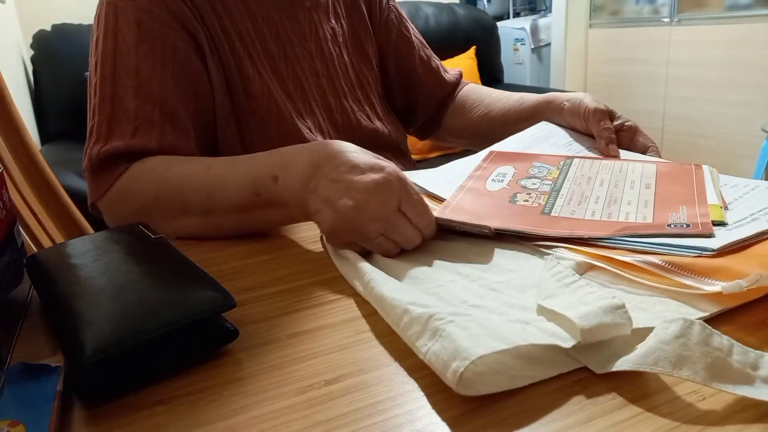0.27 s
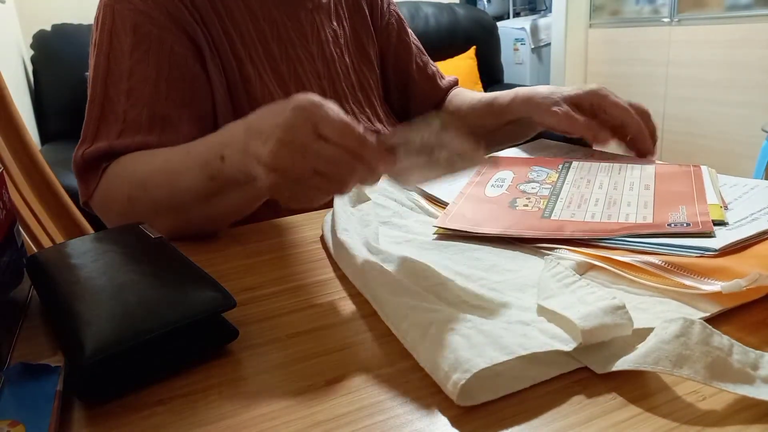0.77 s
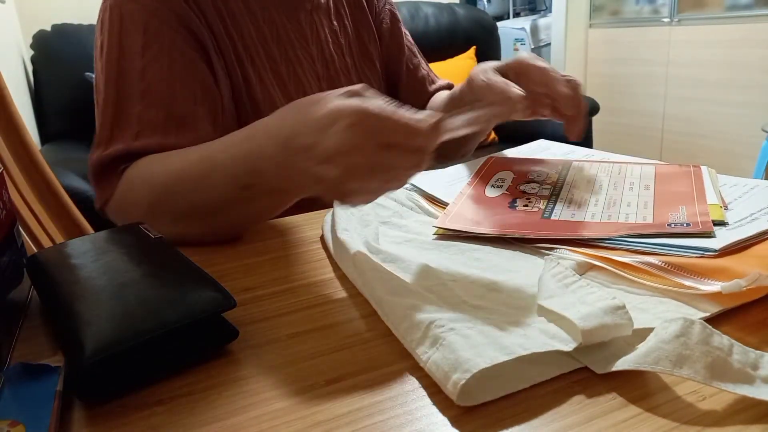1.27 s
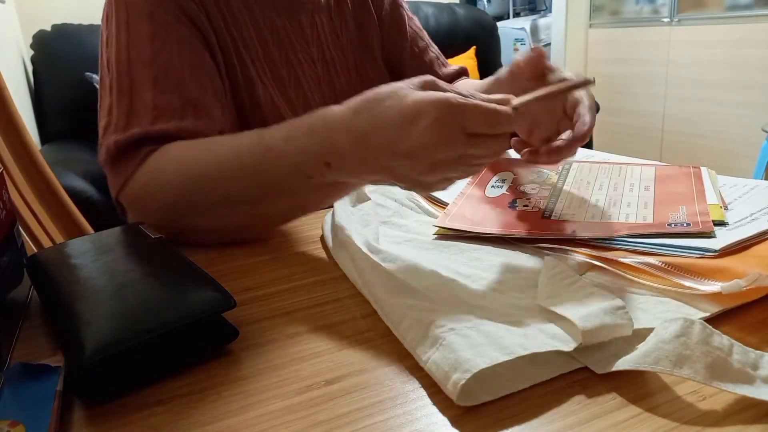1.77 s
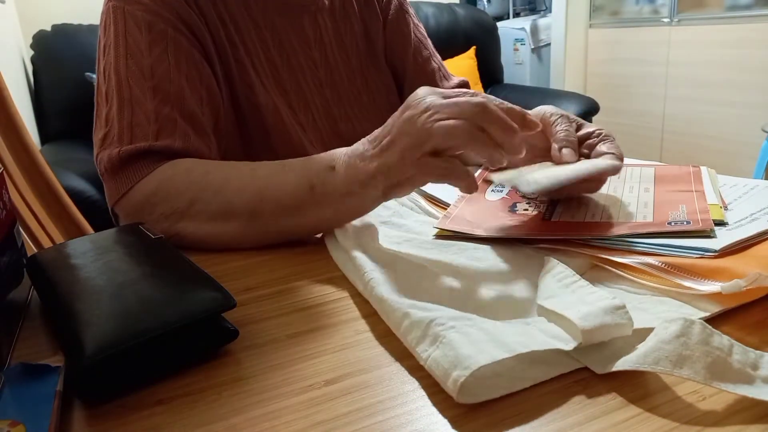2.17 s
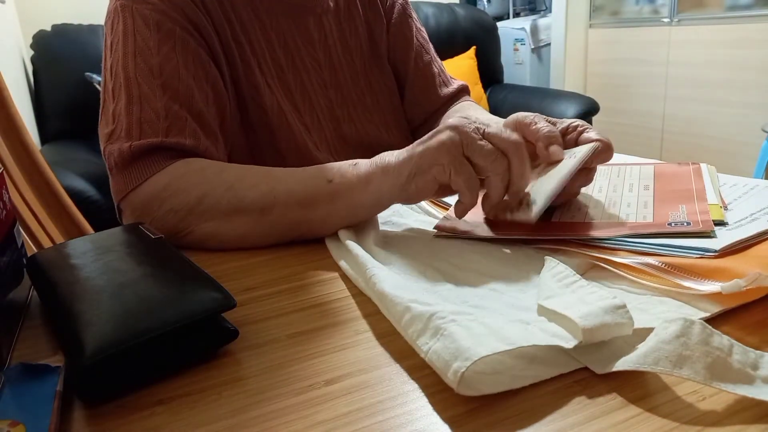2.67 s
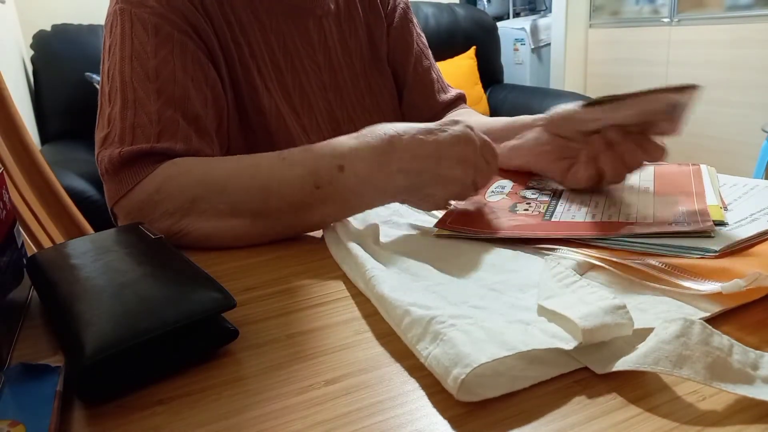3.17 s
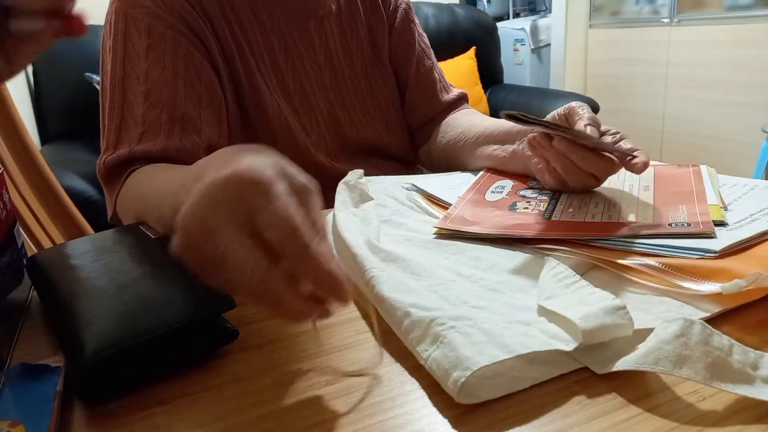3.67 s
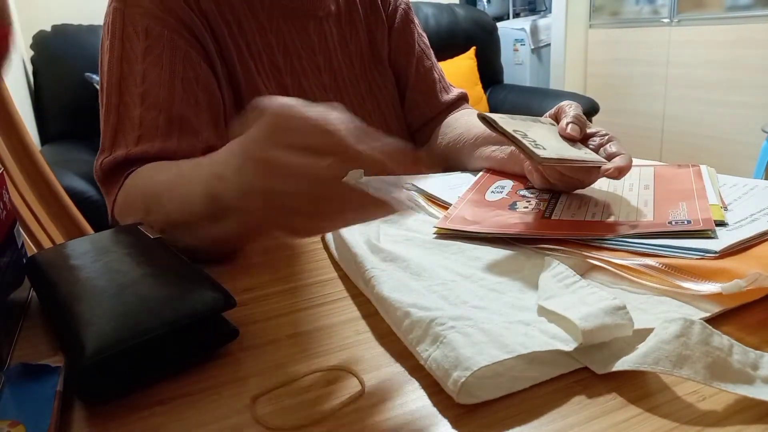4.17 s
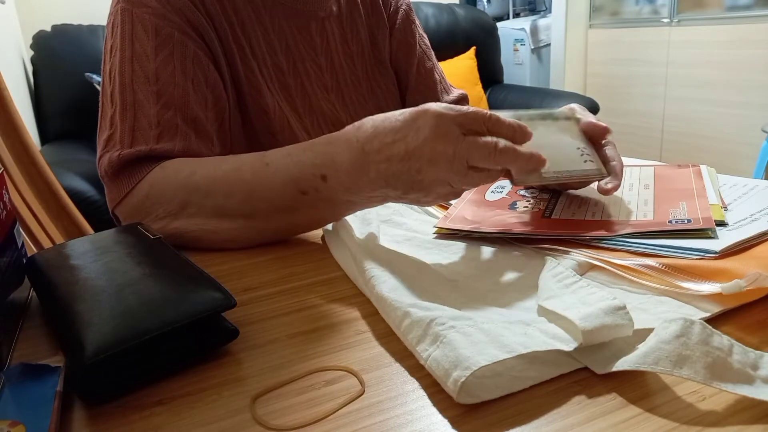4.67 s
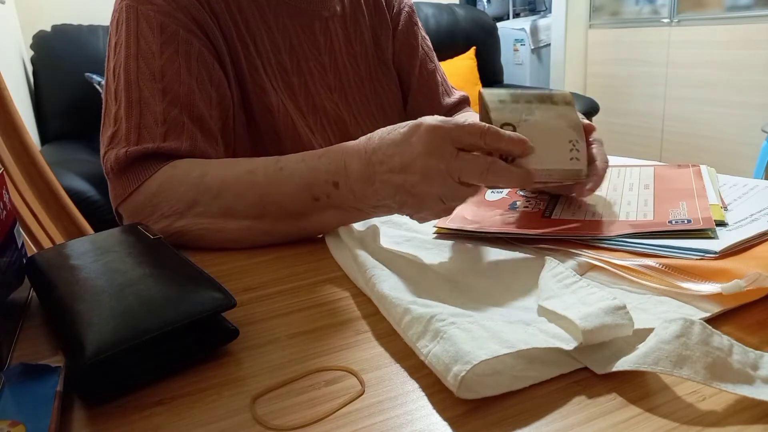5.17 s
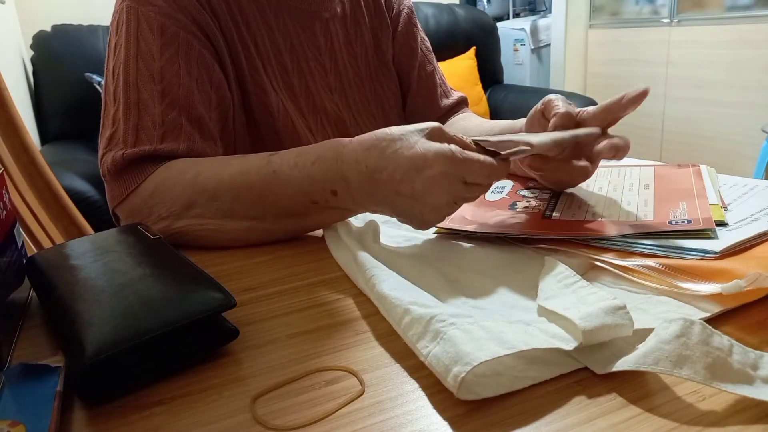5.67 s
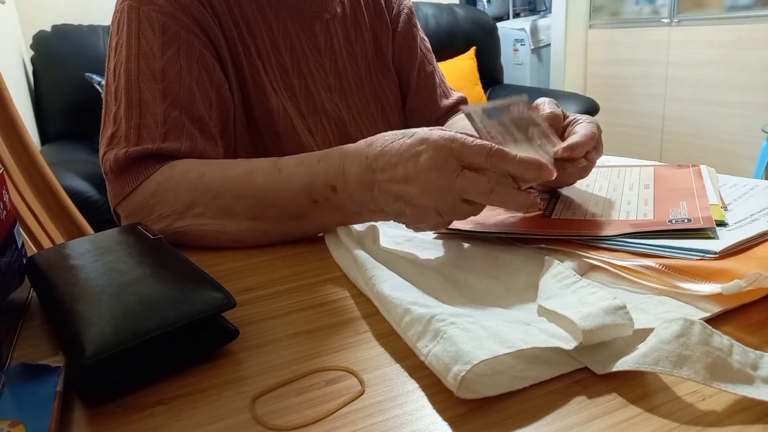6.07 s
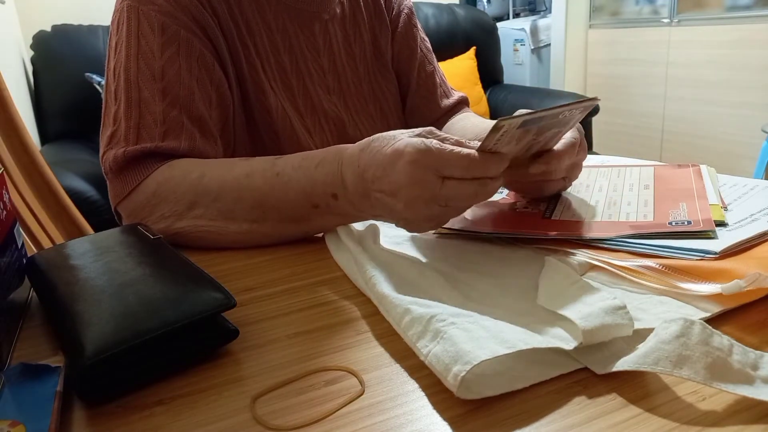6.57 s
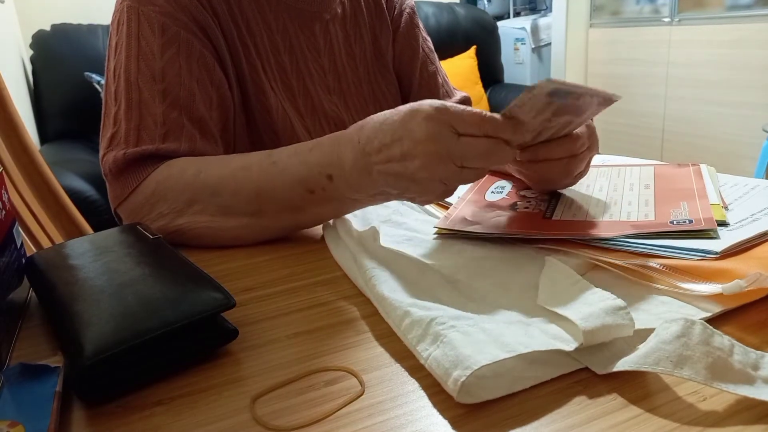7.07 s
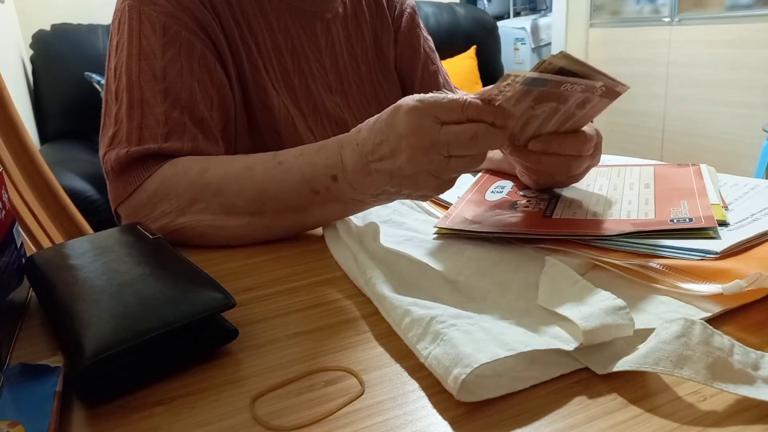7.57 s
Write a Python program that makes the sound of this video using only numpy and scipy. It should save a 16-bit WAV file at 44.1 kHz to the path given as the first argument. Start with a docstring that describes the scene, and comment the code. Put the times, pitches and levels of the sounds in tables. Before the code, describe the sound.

Paper swishes and crackles softly as booklets and banknotes are handled close by, with arms now and then thudding on a wooden table. Past the middle, something hollow and plastic rattles to the left, drops loudly and rebounds, giving a few more light knocks. Quiet counting of the notes follows. A low machine hum fills the small, hard-walled room throughout.

```python
"""A low hum fills a small hard room. Close to a two-port microphone, hands bump a wooden table, slide
booklets, turn a wad of banknotes and count it: grainy swishes of friction, dotted with popping creases.
From about 5 s, out of sight on the left, a hollow plastic thing rocks, falls and bounces, each knock
an edge crack over ringing walls and a low boom. Soft paper strokes and two more thuds close the scene."""
import sys
import numpy as np
from scipy import signal
from scipy.fft import rfft, irfft, next_fast_len
from scipy.io import wavfile
from scipy.ndimage import map_coordinates

SR = 44100
rng = np.random.default_rng(int(sys.argv[2]) if len(sys.argv) > 2 else 0)


def generate_wav(signal):
    """Clip the signal to [-1, 1] and save it as 16-bit WAV at the path in sys.argv[1]."""
    frames = np.transpose(np.atleast_2d(signal))
    scaled = np.clip(frames, -1, 1) * 32767
    pcm = np.round(scaled).astype(np.int16)
    wavfile.write(sys.argv[1], SR, pcm)


N = 344858

# Paper strokes: (loudest time [s], swell [s], fade [s], relative slide level [dB],
# then, against the slide: sheet body [dB], fine hiss [dB], rasp [dB])
STROKES = [(0.1, 0.0029, 0.11, -61.5, -22, -1, -25.5), (0.38, 0.084, 0.58, -73.5, -19, -30, 4),
           (0.569, 0.012, 0.043, -70.5, -14, -12, 17), (0.68, 0.98, 0.13, -69, -7, -5, 0),
           (0.752, 0.19, 0.079, -66, -5, -11, -23), (1.264, 0.01, 0.62, -72.5, -4.5, -8.5, -19),
           (1.4, 0.052, 0.15, -59, 1, -2.5, -5), (1.716, 0.34, 0.16, -62, -9, -4.5, -21),
           (2.03, 0.056, 0.18, -56.5, -6.5, -6, -3.5), (2.131, 0.15, 0.068, -58.5, -15, -1.5, -4),
           (2.34, 0.041, 0.17, -74, 3, -4, 13.5), (2.501, 0.092, 0.15, -75, -3.5, -9, -6),
           (2.801, 0.12, 0.089, -67.5, -12, -0.5, -9.5), (3.1, .15, 0.19, -67.5, -4, -9, 0.5),
           (3.752, 0.13, 0.17, -69.5, 1.5, -11, -16), (3.95, 0.29, 0.16, -77.5, -19, -12, -10),
           (4.45, 0.24, .2, -76, -22, -7, -15), (5.821, 0.2, 0.46, -78, -9, -7, -11.5),
           (6.87, 0.39, 0.13, -82.5, -5, -9, -21.5), (7.292, 0.11, 0.1, -71, -12, -4.5, -25),
           (7.546, 0.27, 0.14, -80, -9, -6.5, -20.5), (7.8, 0.25, 0.17, -72, -4.5, -11, -19)]
STROKE_RANGE_DB = 20  # rise over the swell time, drop over the fade time
# The fingers never rest: (relative slide level [dB], against it: body [dB], fine hiss [dB], rasp [dB])
FIDGET_DB = (-91, 5, -5, -17.5)
# Colours of the paper's slide, sheet body and fine hiss: (frequency [Hz], level [dB])
SLIDE_TONE = [(1530, -21.5), (2600, -42), (2940, 1.5), (3090, -3.5), (3790, 2.5), (5360, 2.5), (6600, 8),
              (8000, -10), (10400, -45.5), (17600, -120)]
SHEET_TONE = [(290, -48), (500, -3.5), (863, -2.5), (1550, -4), (1970, -12), (2530, -7.5), (3010, -14.5),
              (3400, -12.5), (4420, -70.5)]
FINE_TONE = [(4410, -29), (7500, -4), (11000, 0), (12400, 0), (13400, -2), (14900, -4), (15900, -12),
             (16300, -35.5)]
# A stiff cover scraping over the pile: (frequency [Hz], width [Hz], level per pass [dB])
RASP_MODES = [(1476, 600, 1.5), (2260, 790, 5)]
# Creases popping: (time [s], relative level [dB], sheet ring [dB], ring pitch [Hz], fine hiss [dB],
# left over right [dB])
CREASE_POPS = [(0.098, -46, -7.5, 1880, -16, 8), (0.281, -59.5, 8.5, 2420, -26, 8.5),
               (0.3437, -60, 12, 2510, -19, -1), (0.365, -53.5, 5.5, 1800, -16, 5),
               (0.472, -49, -3, 1820, -29, 3.5), (0.5604, -46, 2, 1940, -22, 6),
               (0.573, -46.5, -1.5, 2340, -16, 0), (1.0958, -76.5, 27, 1390, -2, 5),
               (1.3598, -27, -12, 2550, -14, -2.5), (1.3724, -33, 0.5, 2380, -10, 5),
               (1.9803, -54, 3.5, 2150, -2, -12), (2.011, -26.5, -5.5, 2110, -5, -14),
               (2.323, -51.5, 2, 2280, -10, 1.5), (2.3422, -52.5, 7, 2030, -8, 2),
               (2.666, -62, 12, 1600, -23, 5.5), (3.0722, -44, 1.5, 1710, -19, 5.5),
               (3.11, -41, -2, 1586, -37, 4), (4.212, -64, -27, 1270, 3, 7), (4.342, -65, -34, 1250, 6, 14),
               (4.4164, -65, -29, 2060, 5.5, 18), (4.646, -62.5, -18, 1460, -2, 6)]
# The crack of a crease: (frequency [Hz], level [dB])
CREASE_TONE = [(1530, -29), (2600, 4.5), (3090, -1.5), (5760, 4), (8000, -8), (10400, -77)]
# Fingertips on an edge: (time [s], half length [s], pitch [Hz], glide [Hz/s], relative level [dB])
EDGE_RUBS = [(1.655, .04, 1000, 0, -72), (3.775, .06, 1200, -1500, -65), (4.296, 0.05, 3680, 0, -83),
             (4.45, .075, 3800, 6000, -78), (7.56, 0.065, 3280, 0, -77), (7.53, .085, 4350, 0, -73)]

# The plastic thing knocking: (time [s], relative level [dB], wall pitch [Hz], rim ring [dB], boom [dB],
# crack [dB], tick over crack [dB])
KNOCKS = [(4.975, -56, 870, -7, -5, 7, -1), (5.062, -56, 905, -14, 1, 10.5, -17),
          (5.096, -33.5, 850, -17, -4.5, 2.5, -4), (5.105, -29, 867, -30, -7, -19, -13),
          (5.181, -38, 840, -7, 2.5, -2.5, -17.5), (5.19, -33.5, 837, -17, -15, -14, -15),
          (5.24, -31, 875, -22, -6.5, 5, -9.5), (5.254, -23, 842, -15, -15, -14, 2),
          (5.275, -26, 854, -24, -3.5, -17, -1.5), (5.322, -39.5, 864, -4, 5, 2, 2),
          (5.331, -29.5, 895, -9, -23, -4, -15.5), (5.357, -35.5, 815, -9, 2, 7.5, -11),
          (5.386, -9.5, 812, -20, -6, -6.5, -13), (5.399, -29, 800, -21, -1, 4.5, -18.5),
          (5.627, -34, 904, -14.5, -14, -3, -10.5), (5.648, -34.5, 870, -21, -20, -18.5, 7),
          (5.925, -38, 887, -14, -20, -12.5, -13), (5.931, -38, 844, -9.5, -11, -23, -11),
          (5.969, -34, 810, -26, -7, -11.5, -22), (6.075, -48, 824, -6.5, -6, -16, -16),
          (6.095, -31, 867, -16.5, -13, -6.5, -15.5), (6.11, -43.5, 883, -16, -2, -12, -6)]
# The crack of its hard edge: (frequency [Hz], level [dB])
EDGE_TONE = [(1000, -3), (1620, 0), (1800, -17.5), (2020, -11.5), (2390, -4), (3350, -5.5), (3650, 1),
             (4160, -8.5), (6540, -7), (7500, -17.5), (9750, -55)]
# The bright tick on top of a contact: (frequency [Hz], level [dB])
TICK_TONE = [(4410, -45), (7500, -8), (11700, 6.5), (13500, -2), (14700, 1.5), (16300, -19.5)]
# Its air and the floor under it: (frequency [Hz], width [Hz], level per pass [dB])
CAVITY_MODES = [(201, 150, -0.5), (507, 130, 3)]
WALL_WIDTH_HZ, RIM_HZ, RIM_WIDTH_HZ, FLOOR_HZ = 135, 2370, 310, 111
LANDING_S, FIRST_FLIGHT_S, FLIGHT_RATIO = 5.386, 0.044, 0.65  # each bounce is shorter than the last

# Arms and hands landing on the table: (time [s], relative level [dB], pitch [Hz])
THUDS = [(0.038, -42, 214), (0.069, -34.5, 115), (0.71, -47, 594), (1.371, -37, 202), (3.18, -38, 175),
         (3.353, -46, 187), (3.704, -39.5, 300), (3.756, -37, 332), (3.967, -42, 134), (4.027, -43.5, 212),
         (7.17, -41.5, 126.7), (7.216, -39.5, 155)]

# The hum's slow swells: (time [s], level [dB])
HUM_LEVEL = [(0.0, -50), (0.24, -57.5), (2.83, -58), (3.09, -55), (4.42, -56.5), (5.66, -54), (7.62, -58.5),
             (7.82, -56.5)]
# Colours of the hum and the hiss: (frequency [Hz], level [dB])
HUM_TONE = [(15, -76), (25, -40.5), (43, -10), (55, -11.5), (69, -0.5), (88, 1.5), (114, -10.5),
            (184, -2.5), (264, -12.5), (395, -10.5), (424, -16.5), (454, -17), (700, -48), (1540, -120)]
HISS_TONE = [(500, -1), (596, -4), (786, -14), (922, -9), (1350, -17), (2280, -17), (4450, -25),
             (6410, -12), (7420, -29), (14900, -25), (16300, -34)]
# Stereo image of the hum and hiss: (frequency [Hz], left-right likeness [-1..1])
BED_LIKENESS = [(60, 0.87), (180, 0.99), (550, 0.29), (1650, -0.15), (4970, -1), (15000, 0.71)]
# Stereo image of the reverb: (frequency [Hz], left-right likeness [0..1])
ROOM_LIKENESS = [(200, 0.92), (800, 0.41), (2500, 0.15), (8000, 0.194)]
# The room's early decay: (frequency [Hz], time to fall 60 dB [s])
ROOM_T60 = [(200, 0.12), (1000, 0.4), (4000, 0.47), (12000, 0.48)]
LATE_DB, LATE_T60_S = -30.5, 0.73  # the faint long tail
LOW_CUT_HZ, TOP_HZ = 45, 16000


def paper_slides():
    """Paper rubs on paper: slide, sheet body, fine hiss and rasp swell and fade with each stroke."""
    t = np.arange(N) / SR
    layers = [friction(shape(SLIDE_TONE), grain_db=1.5), friction(shape(SHEET_TONE), grain_db=0.5),
              friction(shape(FINE_TONE), grain_db=1.5), friction(resonances(RASP_MODES), grain_db=3.0)]
    layer_power = lambda db, *over_db: amp(db + np.array([0, *over_db])[:, None]) ** 2
    power = layer_power(*FIDGET_DB)
    for time, swell, fade, *levels in STROKES:
        envelope = amp(-STROKE_RANGE_DB * np.maximum((time - t) / swell, (t - time) / fade))
        power = power + layer_power(*levels) * envelope ** 2
    return amp(4.0) * sum(gain * layer for gain, layer in zip(np.sqrt(power), layers))


def crease_pops():
    """Each crease cracks, coloured by a quick echo off the table; the sheet flaps and briefly rings."""
    out = np.zeros((2, N))
    for time, db, ring_db, hz, fine_db, pan_db in CREASE_POPS:
        crack = burst(lambda f: shape(CREASE_TONE)(f) * comb(f, delay_s=2 / hz, share=0.6), t60=0.016)
        hiss = amp(fine_db) * burst(shape(FINE_TONE), t60=0.016)
        sheet = amp(ring_db) * burst(resonances([(800, 700, -2), (hz, 900, 0)]), t60=0.031)
        lag = round(np.clip(3 * pan_db, -20, 20))  # the louder side also hears it first
        place(out, time, amp(db - 6.0) * (crack + hiss + sheet), pan_db, lag, wet_db=-3)
    return out


def fingertip_rubs():
    """Fingertips run along an edge: a narrow hiss that swells and fades, sometimes gliding."""
    out = np.zeros((2, N))
    for time, half_length, hz, glide, db in EDGE_RUBS:
        t = np.arange(N) / SR - time
        swell = np.exp(-(t / half_length) ** 2)
        rumble = friction(lambda f: 1 / (1 + (f / 220) ** 2), grain_db=0.8)
        carrier = np.cos(2 * np.pi * (hz + glide * t / 2) * t)  # lifts the rumble up to pitch
        out += amp(db) * swell * rumble * carrier
    return out


def plastic_clatter():
    """Each knock cracks at the edge; the hollow body's walls and cavity take milliseconds to speak."""
    out = np.zeros((2, N))
    for time, db, hz, rim_db, boom_db, crack_db, tick_db in KNOCKS + bounces():
        onset = time - 0.0013
        stretch = np.exp(rng.normal(0, 0.07))  # each blow lands on another part of the edge
        wall_modes = [(hz, WALL_WIDTH_HZ, 0), (1.78 * hz, 2 * WALL_WIDTH_HZ, -9)]
        wall = ring(wall_modes, t60=0.013, rise=0.002)
        rim_mode = [(RIM_HZ * np.sqrt(stretch), RIM_WIDTH_HZ, 0)]
        rim = amp(rim_db) * ring(rim_mode, t60=0.012, rise=0.00092)
        edge = lambda f: shape(EDGE_TONE)(f * stretch) * comb(f, delay_s=0.001 * stretch, share=-0.35)
        crack = burst(edge, t60=0.012)
        crack += amp(tick_db) * burst(shape(TICK_TONE), t60=0.016)
        knock = trim_send(wall, -3) + trim_send(rim, -2) + amp(crack_db) * trim_send(crack, -3.5)
        place(out, onset, amp(db - 4.5) * knock, pan_db=11.0, lag=20, wet_db=3.5)  # on the ports' axis
        cavity = amp(boom_db) * burst(resonances(CAVITY_MODES), t60=0.0072, rise=0.0021)
        floor = amp(-16.5) * burst(resonances([(FLOOR_HZ, 120, 0)]), t60=0.054, rise=0.0041)
        # The bass bends round to the far port.
        place(out, onset, amp(db - 2.5) * (cavity + floor), pan_db=-3.5, lag=20, wet_db=2.5)
    return out


def bounces():
    """Four rebounds after the fall, as rows like KNOCKS: each comes sooner, softer and duller."""
    rows = []
    for k in range(4):
        time = LANDING_S + FIRST_FLIGHT_S * (1 - FLIGHT_RATIO ** (k + 1)) / (1 - FLIGHT_RATIO)
        db, crack_db = -18 - 1.5 * k, -1.5 - 4.5 * k
        wall_hz, rim_db, boom_db, tick_db = 800, -13, -4, -14.5
        rows.append((time, db, wall_hz, rim_db, boom_db, crack_db, tick_db))
    return rows


def table_thuds():
    """Soft flesh on wood: a dull low ring without a crack."""
    out = np.zeros((2, N))
    for time, db, hz in THUDS:
        thud = burst(resonances([(hz, 150, 0)]), t60=0.066, rise=0.012)
        place(out, time, amp(db - 7.0) * thud, pan_db=1.0, lag=0, wet_db=-1.0)
    return out


def machine_hum():
    """The bed: a low, wavering machine hum over a faint hiss."""
    hum_db = np.interp(np.arange(N) / SR, *np.transpose(HUM_LEVEL))
    hum = amp(hum_db + 2.4 * wobble(14)) * diffuse(HUM_TONE)
    hiss = amp(-77 + 0.27 * wobble(6.4)) * diffuse(HISS_TONE)
    return hum + hiss


def room(send):
    """Stereo room reverb, cut down after 0.1 s as by a noise gate, leaving a faint tail."""
    hz, t, noise = signal.stft(rng.standard_normal((2, SR // 2)), SR, nperseg=256)
    alike = np.clip(along(ROOM_LIKENESS, hz), 0, 1)[:, None]
    noise[1] = alike * noise[0] + np.sqrt(1 - alike ** 2) * noise[1]
    early_db = -60 * t / along(ROOM_T60, hz)[:, None] - 220 * np.maximum(t - 0.1, 0)
    late_db = LATE_DB - 60 * t / LATE_T60_S
    tail = signal.istft(noise * amp(np.maximum(early_db, late_db)), SR, nperseg=256)[1]
    return signal.fftconvolve(send[None], tail / np.linalg.norm(tail[0]), axes=1)


def place(out, time, hit, pan_db, lag, wet_db):
    """Mixes in a (direct, send) hit and its reverb; the right port hears both lag samples later."""
    direct, send = hit
    wet = amp(wet_db) * room(send)
    left = round(time * SR)
    for port, start, gain_db in (0, left, pan_db / 2), (1, left + lag, -pan_db / 2):
        heard = wet[port]
        heard[:len(direct)] += amp(gain_db) * direct
        out[port, start:start + len(heard)] += heard[:N - start]


def trim_send(hit, db):
    """Changes only how much of a hit feeds the room."""
    return hit * amp([[0], [db]])


def burst(response, t60, rise=0.0008):
    """A contact as (direct, send): a noise burst and a click of the same colour; t60 and rise in s."""
    t = np.arange(SR // 10) / SR
    noise = amp(-60 * t / t60) * (1 - np.exp(-t / rise)) * rng.standard_normal(len(t))
    click = np.arange(len(t)) == 200
    hit = filtered(np.array([noise, click]), response)
    return hit / np.linalg.norm(hit, axis=1)[:, None] * np.sqrt(SR / 500)  # energy of 2 ms at level 1


def ring(peaks, t60, rise):
    """A struck resonance: clear up close, while the room hears the whole body in a broader colour."""
    broad = [(hz, 2.1 * width, db) for hz, width, db in peaks]
    direct = burst(resonances(peaks), t60, rise)[0]
    send = burst(resonances(broad), t60, rise)[1]
    return np.array([direct, send])


def friction(response, grain_db):
    """Stereo noise in clumps: fibres catch and slip many times a second."""
    clumps = amp(grain_db * (wobble(40) + wobble(250)))
    return unit(filtered(clumps * rng.standard_normal((2, N)), response))


def diffuse(tone):
    """Stereo noise of rms 1, centred in the bass and wide higher up."""
    def mid_side(hz):
        angle = np.arccos(np.clip(along(BED_LIKENESS, hz), -1, 1)) / 2
        return shape(tone)(hz) * [np.cos(angle), np.sin(angle)]
    mid, side = filtered(rng.standard_normal((2, N)), mid_side)
    return unit(np.array([mid + side, mid - side]))


def resonances(peaks):
    """A bank of band-passes in alternating polarity, passed twice for steep skirts."""
    return lambda f: sum((-1) ** k * amp(db) * 1j * f * width / (hz * hz - f * f + 1j * f * width)
                         for k, (hz, width, db) in enumerate(peaks)) ** 2


def comb(hz, delay_s, share):
    """A sound plus one weaker, later copy: evenly spaced peaks."""
    return 1 + share * np.exp(-2j * np.pi * hz * delay_s)


def shape(points):
    """An EQ curve through (frequency [Hz], level [dB]) points."""
    return lambda hz: amp(along(points, hz))


def filtered(x, response):
    """Plays x through a frequency response."""
    length = x.shape[-1]
    padded = next_fast_len(length + 8192)
    return irfft(rfft(x, padded) * response(np.fft.rfftfreq(padded, 1 / SR)), padded)[..., :length]


def wobble(rate):
    """A smooth random drift, rate knots a second."""
    return map_coordinates(rng.standard_normal(int(N * rate / SR) + 4), [np.arange(N) * rate / SR])


def along(points, hz):
    """Reads (frequency [Hz], value) points on a log axis."""
    knots_hz, values = np.transpose(points)
    return np.interp(np.log(hz + 1), np.log(knots_hz + 1), values)


def amp(db):
    return 10 ** (np.asarray(db) / 20)


def unit(x):
    return x / np.sqrt(np.mean(x ** 2) + 1e-20)


def scene():
    """The stereo mix at the two ports, built up from the bed."""
    return (machine_hum() + table_thuds() + paper_slides() + fingertip_rubs()
            + crease_pops() + plastic_clatter())


def record(dry):
    """The deepest bass is cut away; a steep high cut closes the top."""
    low_cut = filtered(dry, lambda hz: (1j * hz / (LOW_CUT_HZ + 1j * hz)) ** 2)
    return filtered(low_cut, lambda hz: np.clip((TOP_HZ + 550 - hz) / 1000, 0, 1) ** 2)


dry = scene()
out = record(dry)
generate_wav(out)
```